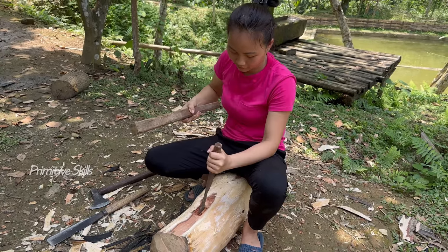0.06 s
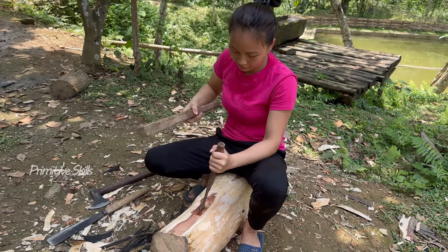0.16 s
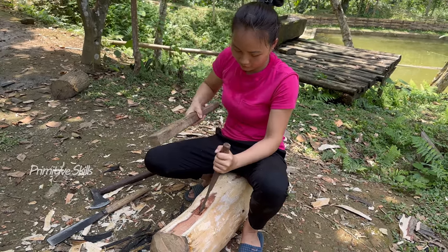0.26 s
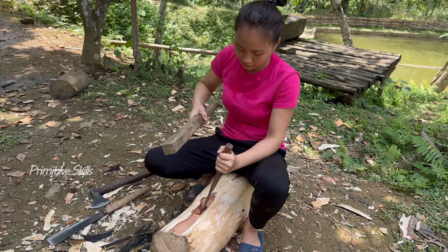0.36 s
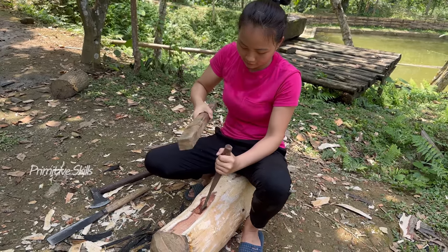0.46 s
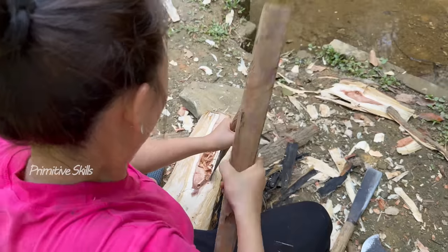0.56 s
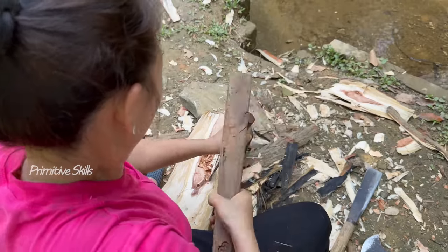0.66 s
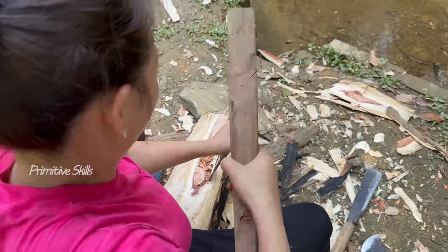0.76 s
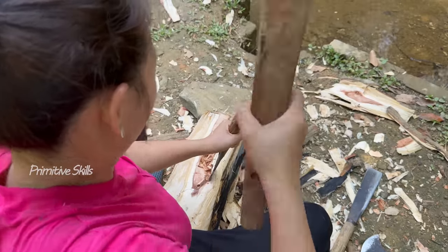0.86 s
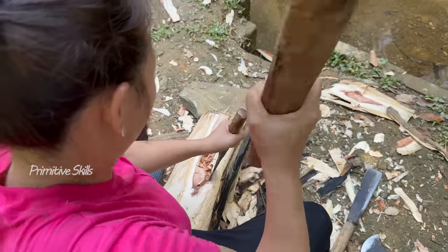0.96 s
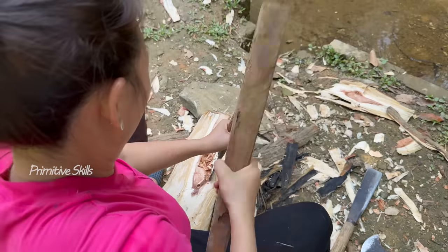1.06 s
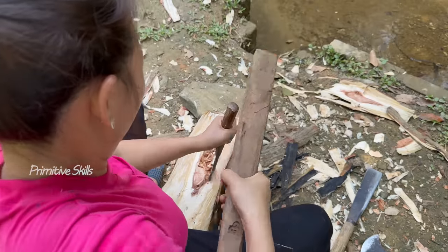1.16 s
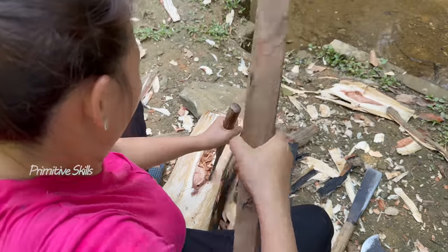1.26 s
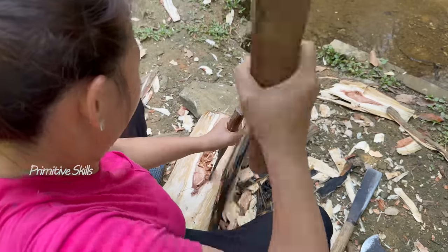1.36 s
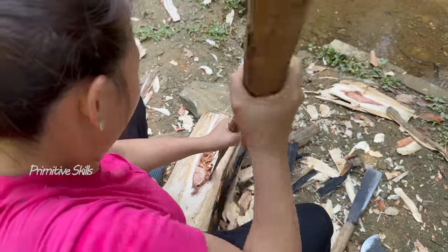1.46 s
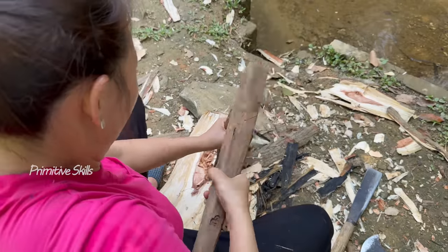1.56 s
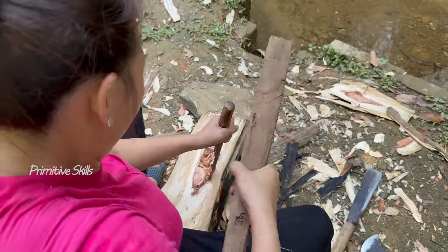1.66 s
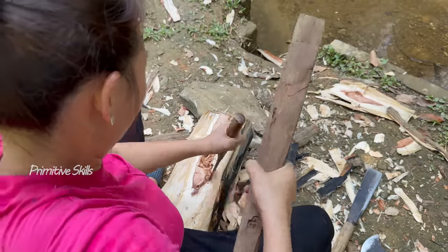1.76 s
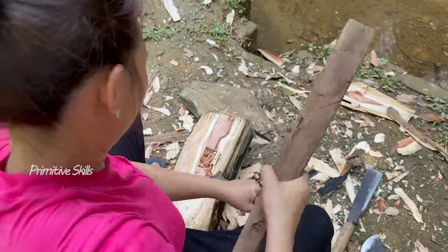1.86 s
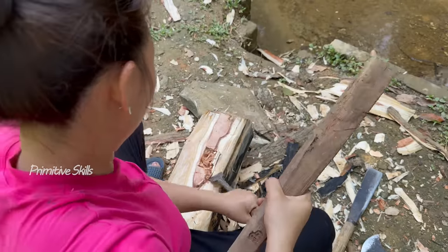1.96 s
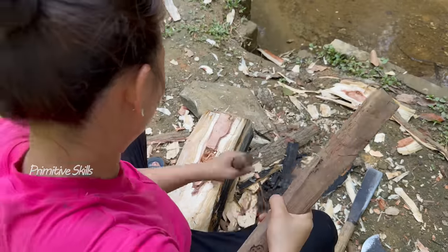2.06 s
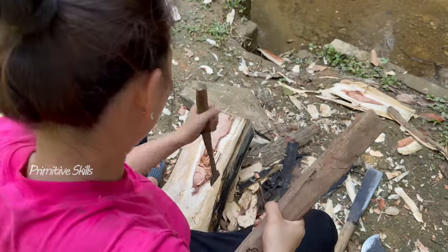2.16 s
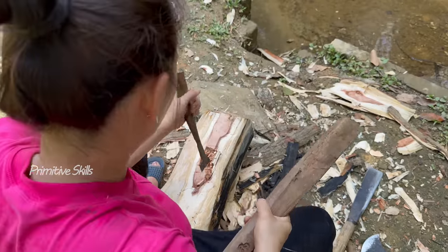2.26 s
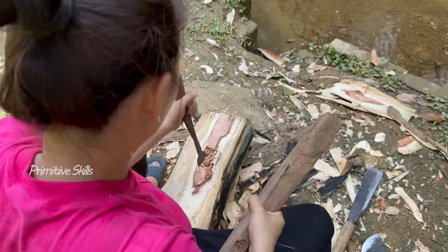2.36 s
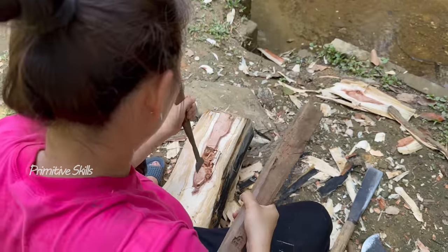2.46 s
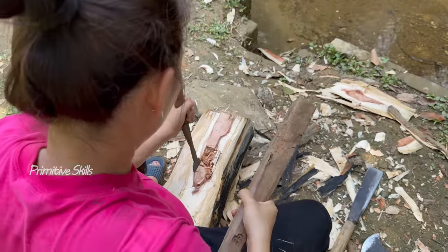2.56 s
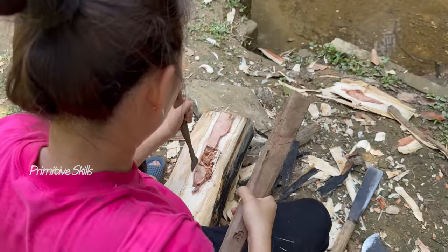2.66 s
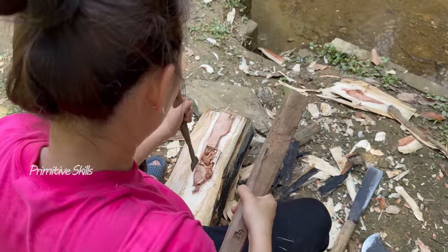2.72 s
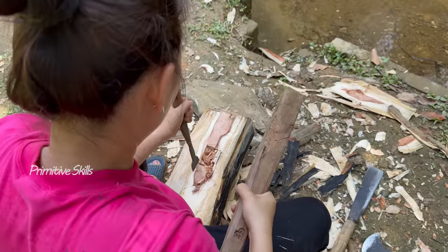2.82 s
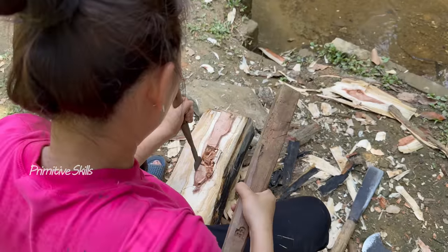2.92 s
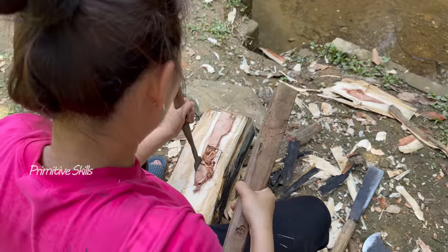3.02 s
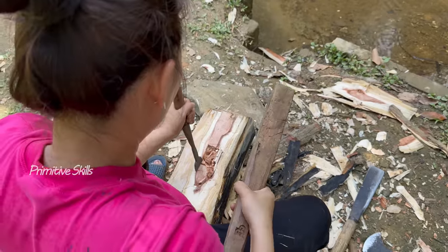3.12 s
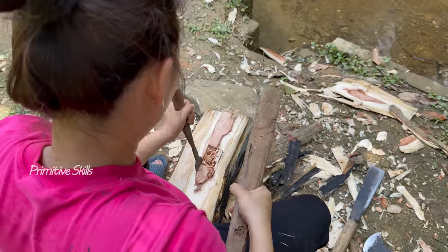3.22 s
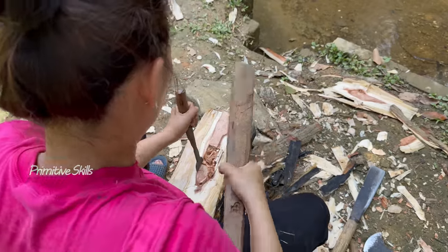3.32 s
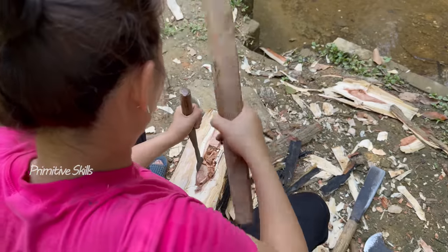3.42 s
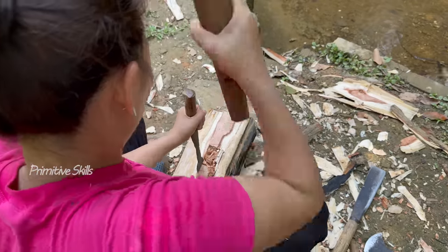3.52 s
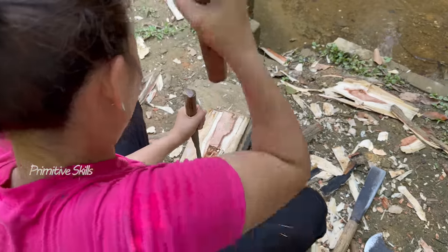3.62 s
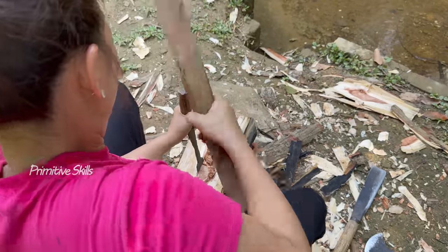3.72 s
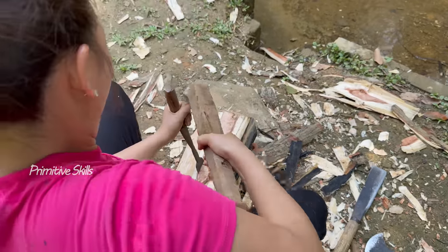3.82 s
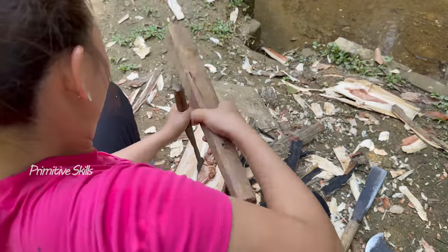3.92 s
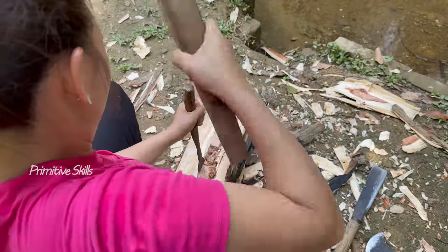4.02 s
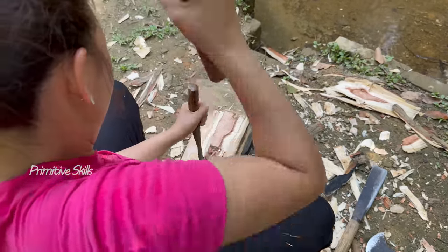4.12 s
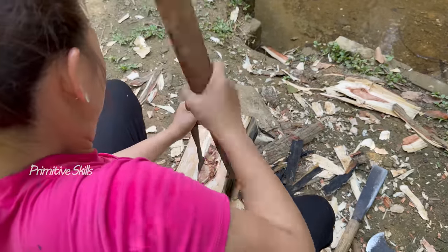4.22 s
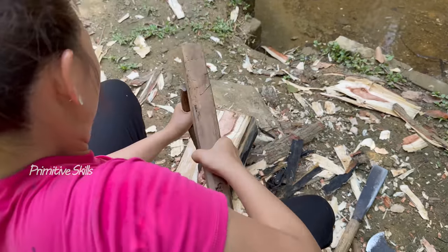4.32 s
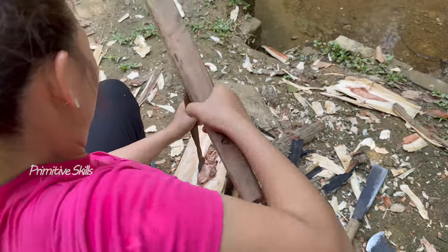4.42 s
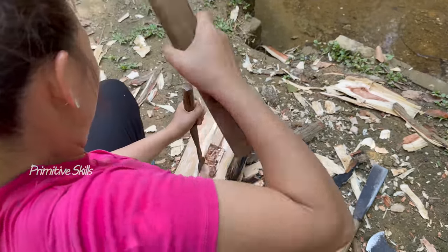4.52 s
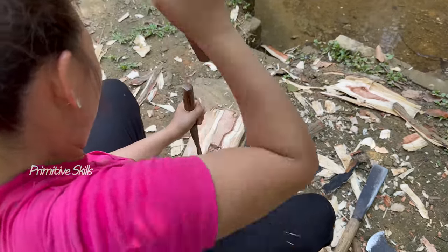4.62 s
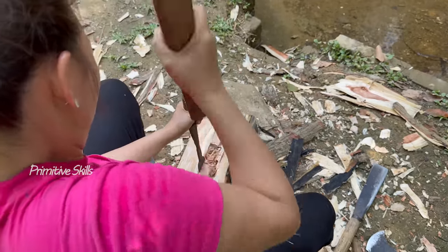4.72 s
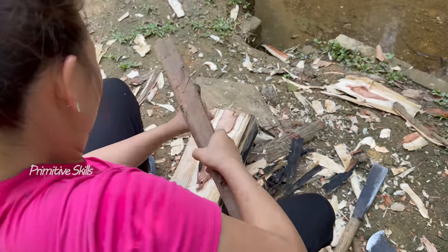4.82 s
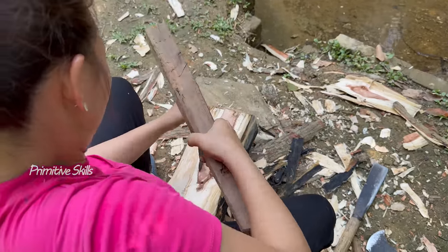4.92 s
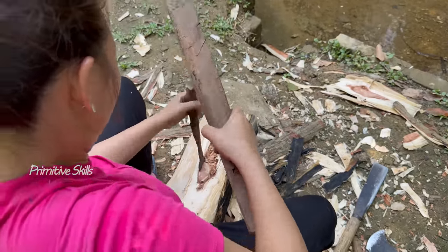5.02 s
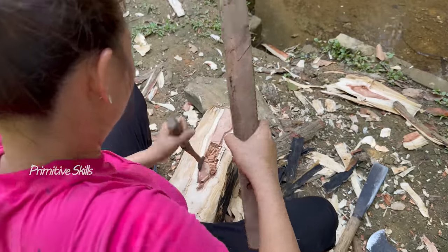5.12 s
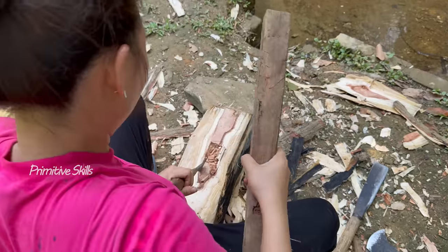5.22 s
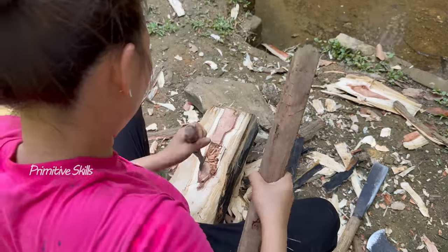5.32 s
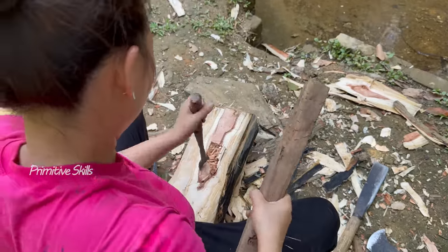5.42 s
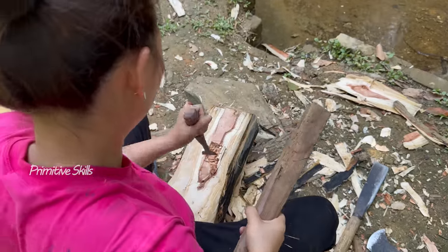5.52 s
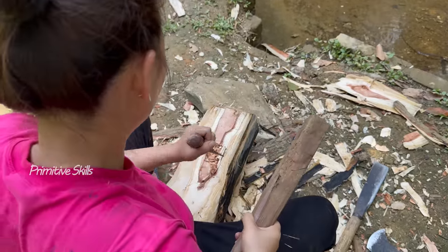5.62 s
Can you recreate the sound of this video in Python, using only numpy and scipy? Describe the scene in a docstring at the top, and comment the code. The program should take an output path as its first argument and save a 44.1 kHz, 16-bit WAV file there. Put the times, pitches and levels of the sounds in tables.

```python
"""Insects shrill over a hiss of water and leaves with faint far-off hoots and a light tap, all beside a pond;
after half a second the scene changes to a quieter background beside the log, and a trickle joins it. A mallet
then drives a chisel into the log: two cuts of three blows. Decaying modes ring wood and chisel, noise bursts
crack the fibres, a falling sine thuds, and noise scatters back from litter, bank and trees. Insects and hoots
are sines, the trickle is small rising bubble tones, hiss and handling taps are shaped noise."""
import sys
import numpy as np
from scipy import signal
from scipy.fft import rfft, irfft
from scipy.io import wavfile
from scipy.ndimage import uniform_filter1d, minimum_filter1d

SR = 44100
rng = np.random.default_rng(int(sys.argv[2]) if len(sys.argv) > 2 else 0)


def put_to_file(sound):
    """Save the sound as 16-bit audio at rate SR, in the file named by the first command-line argument."""
    columns = np.atleast_2d(sound).T  # one column per channel
    safe = np.clip(columns, -1, 1)
    whole_steps = np.round(safe * 32767)
    wavfile.write(sys.argv[1], SR, whole_steps.astype(np.int16))


N = 250488
TIME = np.arange(N) / SR
RING = np.arange(SR // 2) / SR  # half a second, the longest tail of any single event


def undb(db):
    """Decibels to gain."""
    return 10 ** (np.asarray(db) / 20)


def fade(t60):
    """Exponential decay that falls 60 dB in t60 seconds, over the half second of RING."""
    return np.exp(-np.log(1000) * RING / t60)


def read(points, hz):
    """Read (f/Hz, value) points on a log-frequency axis."""
    f, value = np.transpose(points)
    return np.interp(np.log(hz + 1), np.log(f), value)


def colour(x, points):
    """Filter by a (f/Hz, level/dB) curve in the spectrum."""
    size = x.shape[-1]
    gain = undb(read(points, np.fft.rfftfreq(size, 1 / SR)))
    return irfft(rfft(x) * gain, size)


def delay(x, ms):
    """Delay by any fraction of a sample."""
    steps = np.arange(len(x))
    return np.interp(steps - ms * SR / 1000, steps, x, left=0)


def noise(points, side, size):
    """Coloured stereo noise, its mid at unit rms, whose width follows a (f/Hz, side minus mid/dB) curve."""
    mid, wide = colour(rng.standard_normal((2, size)), points)
    side_signal = colour(wide, side) * np.array([[1], [-1]])
    return (mid + side_signal) / np.std(mid)


def walk(rate):
    """Random drift: straight lines between normal random values, `rate` of them a second."""
    knots = np.arange(int(TIME[-1] * rate) + 2)
    return np.interp(TIME * rate, knots, rng.standard_normal(len(knots)))


def add(out, s, sound):
    """Mix a stereo sound in at time s."""
    start = int(s * SR)
    out[:, start:start + sound.shape[1]] += sound[:, :max(N - start, 0)]


def insects(waver_hz=7, flicker_db=2):
    """A steady shrill of close tones whose pitch and level waver separately in each ear."""
    # insect tones before the background's gain: f/Hz, rms level/dB
    tones = [(8145, -72), (8457, -60.5), (8585, -64), (8716, -59), (8812, -71), (8904, -64), (9028, -59.5)]
    out = np.zeros((2, N))
    for hz, db in tones:
        for side in out:
            level = np.sqrt(2) * undb(db + flicker_db * walk(35))
            pitch = hz + waver_hz * walk(29)
            side += level * np.sin(2 * np.pi * np.cumsum(pitch) / SR)
    return out


def background(wide_insect_db=0, near_insect_db=-17, swell_db=-1.0, rustle_db=-68, rustle_flicker_db=3):
    """Hiss of water and leaves with insects; a quick crossfade changes the scene from a louder background to a
    quieter one beside the log."""
    # spectrum heard from further off, then beside the log: f/Hz, relative level per Hz/dB
    wide_hiss = [(18, -39), (30, -8), (100, -4), (404, -5.5), (554, -2.5), (1220, -3), (1910, -6),
                 (2900, -0.5), (7270, -11.5), (8740, -4), (10500, -11), (11700, -67), (12600, -15),
                 (14400, -17.5), (16000, -31)]
    near_hiss = [(18, -40), (30, -24), (53, -6.5), (252, -2.5), (319, -6), (449, -4.5), (540, -15),
                 (889, -2.5), (1350, -6), (1760, -5), (4650, -8.5), (8980, -8), (11700, -21.5), (13700, -5),
                 (16000, -16.5)]
    # stereo width of each: f/Hz, side minus mid/dB
    wide_width = [(60, -6), (110, -17), (200, -7), (380, -4), (700, -4.5), (1290, 5.5), (2380, 0),
                  (4400, 0), (8120, -1.5), (15000, 3)]
    near_width = [(60, -16), (110, -16), (200, -12), (380, -6), (700, -2), (1290, 1), (2380, -2), (4400, 0),
                  (8120, -0.5), (15000, 3.5)]
    wide_db, near_db = -46.5, -58.5
    change_s, crossfade_s = 0.57, 0.0035
    changed = np.clip((TIME - change_s) / crossfade_s, 0, 1)

    shrill = insects()
    wide = undb(wide_db) * noise(wide_hiss, wide_width, N) + undb(wide_insect_db) * shrill
    near = undb(near_db) * noise(near_hiss, near_width, N) + undb(near_insect_db) * shrill
    near = near + trickle()
    swell = undb(swell_db * walk(7))

    rustle_band = [(300, -18), (1500, -20), (2500, 9), (3800, -5.5), (12000, -35)]
    rustle = noise(rustle_band, near_width, N)
    rustle = rustle * undb(rustle_db + rustle_flicker_db * (walk(9) + walk(53)))  # dry leaves stir in fits
    return ((1 - changed) * wide + changed * near) * swell + rustle


def hoots():
    """Short, soft, faint tones from far away, each a sine rising in pitch under a rounded swell."""
    # far-off hoots: t/s, length/s, start f/Hz, end pitch as a ratio of the start, peak level/dB
    calls = [(0.099, 0.028, 845, 1.22, -46), (0.166, 0.061, 538, 1.09, -46.5),
             (0.467, 0.034, 745, 1.01, -50)]
    out = np.zeros((2, N))
    for s, length_s, hz, rise, db in calls:
        along = np.linspace(0, 1, int(length_s * SR))
        tone = np.sin(2 * np.pi * np.cumsum(hz * rise ** along) / SR)
        swell = np.sin(np.pi * along) ** 2
        add(out, s, undb(db) * (tone * swell)[None])
    return out


def handling():
    """Light, dull taps as tools are handled and chips shift: decaying noise around one pitch."""
    # small knocks: t/s, level before halving/dB, centre f/Hz, t60/s
    taps = [(0.313, -29, 1340, 0.032), (1.785, -46, 2800, 0.036), (1.834, -47, 5000, 0.015),
            (2.108, -45, 2450, 0.028), (2.187, -46, 2760, .03), (2.629, -44.5, 2900, 0.028),
            (3.129, -44, 2500, .03), (5.205, -49, 2580, 0.07), (5.295, -46.5, 2500, 0.085)]
    out = np.zeros((2, N))
    for s, db, hz, t60 in taps:
        band = [(hz / 16, -12), (hz / 2, -10), (hz, 0), (hz * 2, -18), (hz * 4, -38)]
        tap = noise(band, [(500, -9), (4000, -1)], len(RING)) * fade(t60)
        add(out, s, undb(db) * tap / 2)
    return out


def trickle(count=1800, db=-65, cycles=11, glide=0.099, spread_db=3):
    """Tiny bubbles ring for a few cycles, gliding up in pitch, as water runs into the pond."""
    # hollows in which the trickle rings: centre f/Hz, pitch spread as a share of f, relative level/dB
    hollows = [(440, 0.06, -6.5), (1030, 0.185, 3.5), (1730, 0.019, 7), (2560, 0.1, 5.5)]
    out, t = np.zeros((2, N)), RING[:SR // 20]
    for i, (when, pan, pitch, size) in enumerate(rng.random((count, 4))):
        centre, spread, band_db = hollows[i % len(hollows)]
        hz = centre * (1 + spread * (2 * pitch - 1))
        age = t * hz / cycles
        phase = 2 * np.pi * hz * t * (1 + glide * np.minimum(age, 1) / 2)
        bubble = np.sin(phase) * np.exp(-2 * age)
        size_db = -spread_db * np.log(1 - .97 * size)  # many small bubbles, few loud ones
        gain = undb(db + band_db + size_db) * np.sqrt([[pan], [1 - pan]])
        add(out, when * TIME[-1], gain * bubble)
    return out


def modes(table, damping):
    """Sum the decaying tones of one object; damping divides every decay time."""
    total = 0
    for hz, db, t60, pan_db in table:
        gain = undb(db + np.array([[pan_db], [-pan_db]]) / 2)
        total = total + gain * np.cos(2 * np.pi * hz * RING) * fade(t60 / damping)
    return total


def bending(degrees, overtone_db):
    """The blow's direction shares its force between two bending planes; the seat in the log sets the overtone."""
    # lowest modes across the chisel's thin and broad side; from even_hz modes ring in any direction
    thin_hz, broad_hz, even_hz, overtone_hz = 794, 1126, 1772, 3010
    square_db = 3.5  # gain of a bending mode that is struck squarely
    angle = np.radians(degrees)
    force = np.abs([np.cos(angle), np.sin(angle)]) + 1e-6
    thin_db, broad_db = square_db + 20 * np.log10(force)
    return [(thin_hz, thin_db), (broad_hz, broad_db), (even_hz, 0), (overtone_hz, overtone_db)]


def knock(contact_ms, bend, grip, crack_db, snap_db, crack_t60=0.018, snap_t60=0.012):
    """The mallet's short push rings wood and chisel while the edge cracks into the fibres and snaps some."""
    # quickly damped modes of mallet and log: f/Hz, level/dB, t60 before the grip's damping/s, left minus right/dB
    wood_modes = [(386, -26.5, 0.022, -4.5), (525, -28, 0.025, 0), (790, -20, .021, -1.5),
                  (870, -17.5, 0.027, -2.5), (1153, -18.5, 0.034, 4.5), (1485, -19, 0.017, 7),
                  (1729, -4.5, 0.024, 1), (1945, -13.5, 0.018, 12), (2406, -14.5, .018, -7),
                  (2836, -11, 0.023, 2), (2965, -4, 0.019, 6), (3787, -17, 0.016, 0),
                  (4223, -13.5, 0.016, -7), (5620, -29, .012, 5)]
    # longer modes of the seated chisel, mostly close, beating pairs:
    # f/Hz, level before the bend/dB, t60 before damping/s, left minus right/dB
    chisel_modes = [(348, -44, 0.14, -9), (797, -25.5, 0.13, 0), (1070, -28.5, 0.14, 1.5),
                    (1121.4, -31, 0.16, 3), (1772, -35, .26, 0.5), (1796, -35, 0.25, 4),
                    (3015, -30, .19, 2), (3095, -33.5, .14, 5)]
    # the edge crushing fibres: f/Hz, relative level per Hz/dB
    crack_band = [(200, -39), (700, -11.5), (1500, 32), (3000, 6.5), (5500, -1.5), (7000, -8.5),
                  (10000, -2.5), (16000, -56)]
    # dry fibres parting: f/Hz, relative level per Hz/dB
    snap_band = [(2000, -22.5), (3400, -5.5), (4300, 6.5), (5500, -20), (8000, -21.5), (14000, -20)]
    bent = [(hz, db + read(bend, hz), t60, pan_db) for hz, db, t60, pan_db in chisel_modes]
    ring = modes(wood_modes, grip) + modes(bent, 0.97)
    push = RING * np.exp(-RING * 1000 / (contact_ms / 4))  # peaks a quarter of the way through the contact
    ring = signal.fftconvolve(ring, push[None] / push.sum())[:, :len(RING)]
    crack = noise(crack_band, [(500, -17.0), (4000, 5.5)], len(RING)) * fade(crack_t60)
    snap = noise(snap_band, [(4000, -3), (14000, -4)], len(RING)) * fade(snap_t60)
    left, right = ring + undb(crack_db) * crack + undb(snap_db) * snap
    return np.array([left, delay(right, .068)])  # the left ear hears the knock sooner, in ms


def thump(fall_hz, db=-38, t60=0.21, lag_ms=1.0, low_hz=62, fall_s=.007, swell_s=0.0049):
    """A soft thud through log and ground: a swelling sine falls in pitch, so its lowest part arrives last."""
    hz = low_hz + fall_hz * np.exp(-RING / fall_s)
    swell = (1 - np.exp(-(RING / swell_s) ** 2)) * np.sqrt(hz / hz[-1])
    thud = undb(db) * np.sin(2 * np.pi * np.cumsum(hz) / SR) * swell * fade(t60)
    return np.array([thud, delay(thud, lag_ms)])


def surroundings(hit, echo_db=-54, echo_t60=0.27, far_db=-69, far_t60=0.61,
                 litter_db=-39, litter_t60=0.33, build_s=0.0061):
    """Countless small reflections: bright ones from the litter close by, fainter ones from bank and trees."""
    # litter scatter: f/Hz, relative level per Hz/dB
    scatter_band = [(100, -2), (350, -9.5), (580, -32.5), (900, 3.5), (1400, -7), (2000, 5.5), (2600, -1),
                    (3100, -4), (4500, -8), (7000, -15), (15000, -72)]
    path_band = [(100, -7), (800, -4.0), (1700, -1.5), (5000, -3.5)]
    build = 1 - np.exp(-(RING / build_s) ** 2)
    decay = undb(echo_db) * fade(echo_t60) + undb(far_db) * fade(far_t60)
    paths = noise(path_band, [(300, -6), (2000, 5.5)], len(RING)) * build * decay
    litter = noise(scatter_band, [(300, -11.5), (2000, -3.5)], len(RING)) * build * fade(litter_t60)
    echoes = signal.fftconvolve(paths, hit.mean(axis=0)[None])[:, :len(RING)]
    return echoes + undb(litter_db) * litter


def bank_echo(hit, ms, db=-33):
    """One faint, thin slap from across the pond: the blow delayed, in mono, with its lows and top cut."""
    return undb(db) * colour(delay(hit.mean(axis=0), ms), [(700, -14), (1800, -3), (3000, 3), (6000, -15)])


def chiselling():
    """Each blow with a reflection off log and arm and an outdoor tail; the thud keeps one level within a cut."""
    # mallet blows: t/s, level/dB, contact/ms, direction in which the chisel is bent/degrees,
    # damping of the wood by the grip/factor, crack before the blow's level/dB, snap before the blow's level/dB
    blows = [(0.6333, 0, 0.17, 37, 0.86, -10.5, -12.5), (1.1192, -1, 0.13, 59, 1.03, -14, -19.5),
             (1.5842, -0.5, .17, 86, 0.95, -11.5, -20.5), (3.7912, 0, 0.32, 45, 1.2, -9.5, -42),
             (4.3156, -.5, 0.19, 59, 1.2, -15, -41), (4.8345, -1.5, 0.25, 25, 0.98, -8.5, -24.5)]
    # where chisel and arm are set for each cut: starts at t/s, nearby reflection/ms, its share left/gain,
    # its share right/gain, thud gain/dB, fall of the thud's pitch/Hz, scatter gain/dB,
    # chisel's overtone gain/dB, echo off the bank/ms
    cuts = [(0.5, 2.32, 0.16, 0.22, 0.5, 358, -1, 2, 61), (3.4, 1.326, 0.064, 0.4, -2, 110, 2.5, -2.5, 66)]
    out = np.zeros((2, N))
    for s, db, contact_ms, degrees, grip, crack_db, snap_db in blows:
        cut = [row for row in cuts if row[0] < s][-1]
        near_ms, share_left, share_right, thud_db, fall_hz, scatter_db, overtone_db, bank_ms = cut[1:]
        hit = knock(contact_ms, bending(degrees, overtone_db), grip, crack_db, snap_db)
        near = np.array([share_left * delay(hit[0], near_ms), share_right * delay(hit[1], near_ms)])
        tail = undb(scatter_db) * surroundings(hit) + bank_echo(hit, bank_ms)
        add(out, s, undb(db) * (hit + near + tail) + undb(thud_db) * thump(fall_hz))
    return out


def scene():
    """The pond side, far hoots, small handling sounds and the blows."""
    return background() + hoots() + handling() + chiselling()


def record(dry):
    """The microphone sheds the deepest bass, a fast limiter holds the blows under full scale, the top is cut."""
    bass_cut = signal.butter(4, 45, "highpass", fs=SR, output="sos")
    top_cut = signal.ellip(8, .2, 70, 16200, fs=SR, output="sos")
    sound = signal.sosfilt(bass_cut, dry)
    ceiling, hold = .92, 25  # full scale = 1, samples
    gain = ceiling / np.maximum(np.abs(sound).max(axis=0), ceiling)
    gain = uniform_filter1d(minimum_filter1d(gain, hold), hold)
    return signal.sosfilt(top_cut, sound * gain)


dry = scene()
out = record(dry)
put_to_file(out)
```